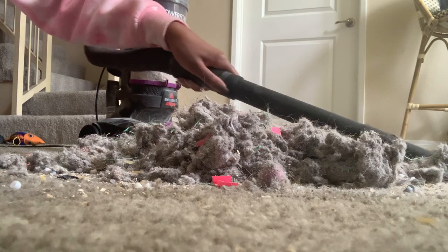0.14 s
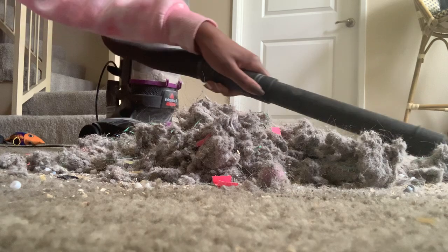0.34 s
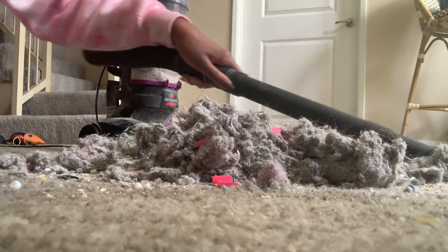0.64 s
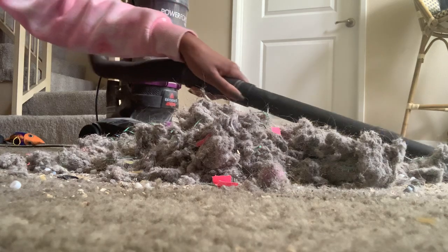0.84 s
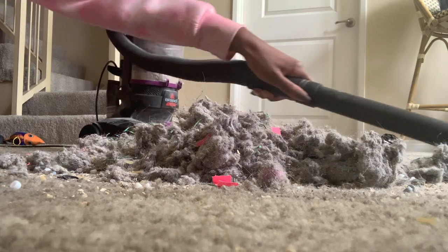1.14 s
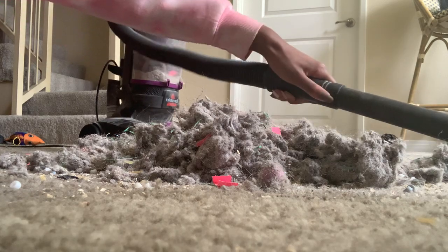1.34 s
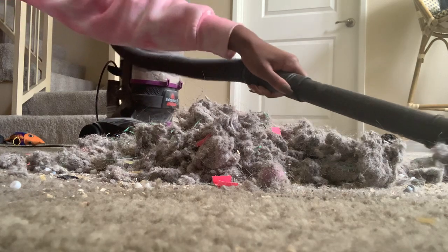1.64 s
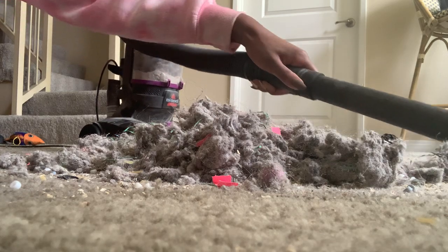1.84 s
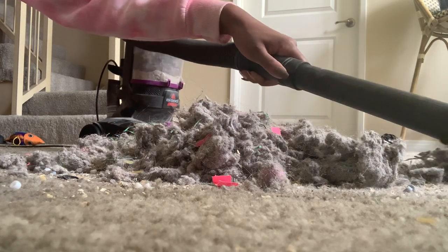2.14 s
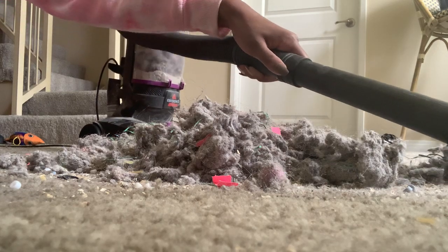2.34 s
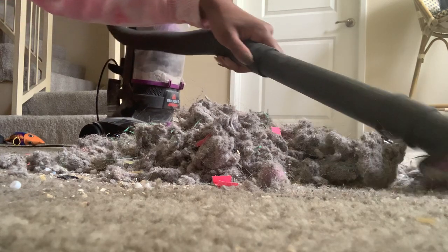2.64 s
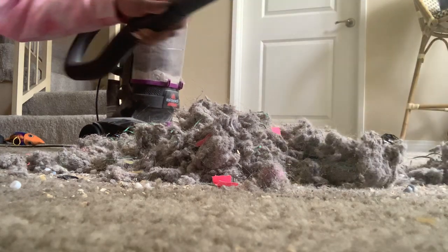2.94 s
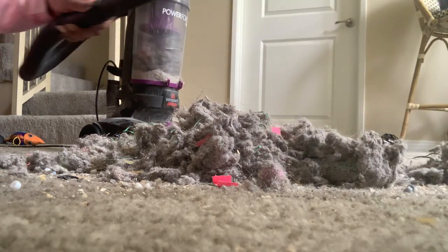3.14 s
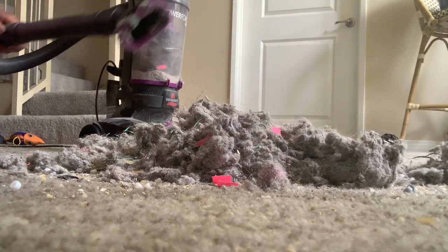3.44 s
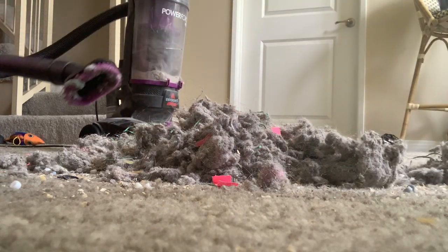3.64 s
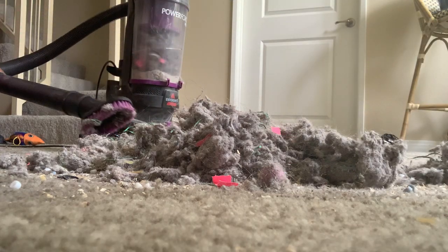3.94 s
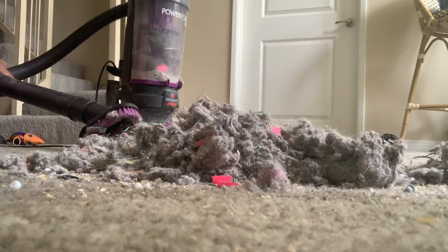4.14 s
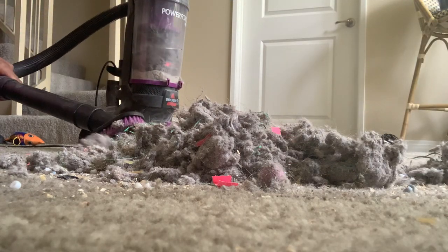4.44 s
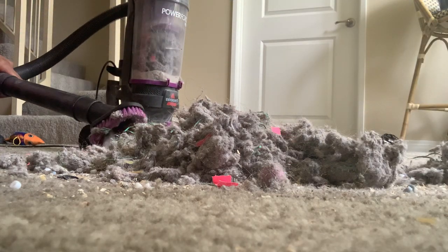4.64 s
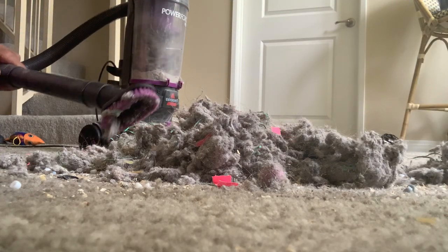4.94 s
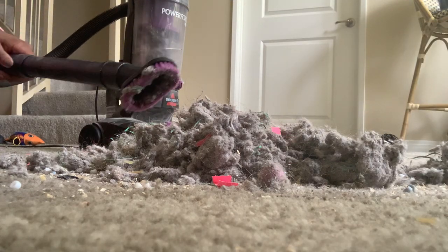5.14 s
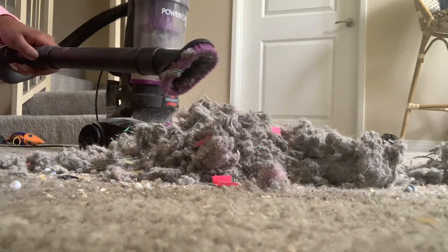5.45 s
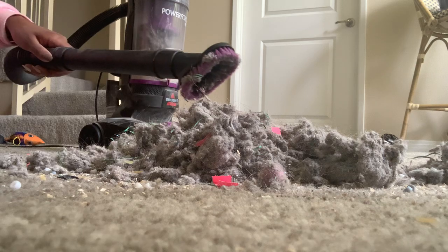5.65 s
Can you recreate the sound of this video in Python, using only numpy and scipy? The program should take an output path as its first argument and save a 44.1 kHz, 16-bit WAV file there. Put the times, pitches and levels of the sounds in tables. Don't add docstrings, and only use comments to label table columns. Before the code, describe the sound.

Continuous vacuum noise heard close and low in a furnished room, in stereo. The motor tone holds nearly steady, dipping a little under load in the middle while the hose flutters softly. Small debris ticks and rattles irregularly throughout. Muffled floor thumps and a wand knock occur in the first second, a hard double snap near two, a ping near three, and a cluster of thumps after four and a half.

```python
import sys
import numpy as np
from scipy import signal
from scipy.fft import rfft, irfft, next_fast_len
from scipy.io import wavfile

SR = 44100
rng = np.random.default_rng(int(sys.argv[2]) if len(sys.argv) > 2 else 0)


def unload_audio(sound):
    columns = np.transpose(np.atleast_2d(sound))
    steps = np.round(np.clip(columns, -1, 1) * 32767)
    wavfile.write(sys.argv[1], SR, steps.astype(np.int16))


def elevation(decibels):
    levels = np.asarray(decibels, float)
    return 10 ** (levels / 20)


N = 254892
TIME_S = np.arange(N) / SR

# t/s, shaft f/Hz, whine level/dB, left-right/dB as the hose shades it
MOTOR_RUN = [(0.05, 482.6, -25, .8), (0.42, 483.8, -24.5, 0.5), (0.6, 479.6, -26, 6),
             (1.0, 479.4, -26.5, 6.7), (1.2, 479.7, -27, 8), (1.4, 476.2, -27, 3.5), (1.6, 475.5, -29, 0.5),
             (1.8, 475.6, -29, 5.5), (2.0, 475.5, -29, 2.5), (2.6, 473.5, -29, 3.5), (3.0, 477.7, -30, 5),
             (3.2, 480.8, -27, 7.5), (3.6, 482.6, -26, 1.5), (4.0, 482, -25.5, -.2),
             (4.55, 484.6, -25.5, -0.5), (4.75, 486.8, -27.5, 0), (5.0, 484.3, -25.5, -0.5),
             (5.73, 483.3, -25, -1.1)]
SHAFT_IDLE_HZ = 483.0


def rms_one(x):
    return x / np.sqrt(np.mean(x ** 2) + 1e-20)


def in_time(rows):
    s, *columns = np.transpose(rows)
    return [np.interp(TIME_S, s, c) for c in columns]


def at_hz(points, hz):
    at, *columns = np.transpose(points)
    return [np.interp(np.log(hz + 1), np.log(at), c) for c in columns]


def drift(rate):
    r = np.exp(-80 * np.pi * rate / SR)
    chance = rng.standard_normal(N // 40 + 2002)
    slow = signal.lfilter([1], [1, -2 * r, r * r], chance)[2000:]
    return np.interp(np.arange(N) / 40, np.arange(len(slow)), rms_one(slow))


def phase_of(hz):
    return 2 * np.pi * np.cumsum(hz) / SR


def shaped(x, response):
    size = next_fast_len(N + 2048, real=True)
    return irfft(rfft(x, size) * response(np.fft.rfftfreq(size, 1 / SR)), size)[..., :N]


def panned(pan_db):
    return elevation([[pan_db / 2], [-pan_db / 2]])


def shaft_loss_hz():
    return SHAFT_IDLE_HZ - in_time(MOTOR_RUN)[0]


def port_pair(hz):
    # f/Hz, likeness 0-1, right lead/rad, left-right/dB
    port_match = [(60, 1, 0.5, 1), (250, 0.79, -0.33, -8.5), (660, 0.5, -0.5, 3), (1070, 0.5, -1.3, 2),
                  (1740, 0.2, .3, 0), (2300, 0.35, 3.3, -1), (2750, 0.78, 3.25, .5), (3200, 0.77, 3.4, 1),
                  (3700, 0.4, 3.2, 1), (4700, 0.33, 2.6, .5), (6100, 0.6, 1., -.5), (6700, 0.52, 1.6, 1),
                  (7150, 0.74, 2.35, 1), (7800, 0.93, 2.9, 0)]
    lag_hz, opposed_hz = 8200., 8300.
    scatter = 0.37
    alike, lead, pan_db = at_hz(port_match, hz)
    above = hz > port_match[-1][0]
    lead = np.where(above, np.pi + 2 * np.pi * (hz - opposed_hz) / lag_hz, lead)
    alike = np.where(above, np.sqrt(1 - scatter * np.sin(lead) ** 2), np.clip(alike, 0, 1))
    pan_db = np.where(above, 0, pan_db * (hz < port_match[-1][0]))
    left_gain, right_gain = elevation(pan_db / 2), elevation(-pan_db / 2)
    right = alike * np.exp(1j * lead) * right_gain
    room = np.sqrt(1 - alike ** 2) * right_gain
    return np.array([left_gain, right, room])


def ports(direct, diffuse):
    left, right, room = shaped(np.array([direct, direct, diffuse]), port_pair)
    return np.array([left, right + room])


def thumps():
    # t/s, peak level/dB, first f/Hz, last f/Hz
    floor_blows = [(0.302, -32, 400, 98.5), (0.329, -36, 300, 100), (0.408, -27, 260, 230),
                   (.429, -15.5, 463, 84.5), (0.467, -27, 150, 90), (.505, -32, 120, 84.5),
                   (0.786, -33, 150.3, 110), (0.809, -23, 260, 223), (.862, -23, 400, 255),
                   (0.982, -29, 333, 120), (4.449, -28, 379, 282.4), (4.482, -28, 218, 90.2),
                   (4.526, -28, 220.7, 82), (4.589, -28, 199, 123), (4.633, -15, 413, 90),
                   (4.675, -16, 79.7, 115.6), (4.678, -42, 352, 300), (4.713, -15.5, 520, 87),
                   (4.748, -32, 110, 95), (4.81, -26, 80.1, 100), (4.852, -21, 475.4, 93),
                   (5.149, -33, 200.7, 130)]
    cycles, pan_db = 1.82, -4.5
    out = np.zeros((2, N))
    low_band = signal.butter(2, [60, 420], "band", fs=SR, output="sos")
    rumble = rms_one(signal.sosfilt(low_band, rng.standard_normal(N)))
    for s, peak_db, first_hz, last_hz in floor_blows:
        length_s = cycles / last_hz
        share = np.arange(round(3 * length_s * SR)) / (length_s * SR)
        i = round(s * SR)
        sweep = np.sin(phase_of(last_hz + (first_hz - last_hz) * np.exp(-6. * share)))
        blow = elevation(peak_db) * np.sin(np.pi * np.minimum(share, 1) ** 0.5) * sweep
        tail = elevation(peak_db - 17.0) * share * np.exp(1 - 0.86 * share) * rumble[i:i + len(share)]
        out[:, i:i + len(share)] += panned(pan_db) * (blow + tail)
    return out


def knocks():
    # t/s, peak level/dB, brightness/dB per octave
    wand_hits = [
        (0.5463, -15.5, 0),
        (0.8632, -25, 0.0011),
    ]
    # f/Hz, level/dB, t60/s
    wand_modes = [(260, -7, 0.058), (519, 10, 0.022), (760, -4, 0.023), (1120, -2, 0.013),
                  (1600, -2, 0.0044)]
    out, t = np.zeros(N), np.arange(2000) / SR
    attack = np.minimum(t / .0009, 1)
    for s, peak_db, bright_db in wand_hits:
        for hz, level_db, t60 in wand_modes:
            octaves = np.log2(hz / wand_modes[0][0])
            level = elevation(peak_db + level_db + bright_db * octaves - 60 * t / t60)
            out[round(s * SR):][:len(t)] += level * attack * np.sin(2 * np.pi * hz * t)
    return out


def pings():
    # t/s, peak level/dB, f/Hz
    nozzle_pings = [
        (2.769, -29, 2484),
        (2.9535, -18.5, 3916),
    ]
    burst_s = 0.0011
    out = np.zeros(N)
    for s, db, hz in nozzle_pings:
        burst = np.exp(-((TIME_S - s - burst_s) / burst_s) ** 2)
        out += elevation(db) * burst * np.sin(2 * np.pi * hz * TIME_S)
    return out


def snaps():
    # t/s, peak level/dB
    wall_cracks = [
        (1.8995, -1),
        (1.9087, 0.5),
    ]
    hz, burst_s = 11500, .00009
    out = np.zeros(N)
    for s, db in wall_cracks:
        t = TIME_S - s
        out += elevation(db) * np.exp(-(t / burst_s) ** 2) * np.sin(2 * np.pi * hz * t)
    return out


def grit():
    # t/s, level/dB, brightness/dB per band
    lone_grains = [(0.0845, -21, 6), (0.1077, -19, 4), (0.2413, -13, -3), (0.33, -21, 9),
                   (0.371, -15.5, 0.5), (0.7, -19, 4), (0.83, -17, 2), (0.8763, -23, 4), (0.9259, -24, 6),
                   (0.9626, -25, 9), (1.2664, -23, 1), (1.5399, -24, 10), (1.762, -21, 9),
                   (1.8934, -23, -5), (1.966, -20, 3), (2.0332, -22.5, 5), (2.1869, -13, -2),
                   (2.2658, -22, 7), (2.541, -19, 8.5), (3.622, -19, 3), (3.6553, -18, -1),
                   (3.7418, -13, 0), (3.7831, -15.5, 2), (3.831, -22.5, 9), (4.132, -24, 11),
                   (4.682, -19, -2), (4.7063, -22, 0), (4.8598, -21, 3), (5.1449, -11, -0.5),
                   (5.4309, -19, 5)]
    # t/s, level/dB, brightness/dB per band
    more_grains = [(.8195, -23.5, 9), (1.2106, -20.5, 9), (1.443, -25, 2), (2.3186, -19, -2),
                   (3.029, -18, 3), (3.0833, -19, 1), (3.146, -17, 4), (3.2065, -18, 3), (3.2225, -25, 3),
                   (3.4856, -20, 3), (3.7929, -19, 5), (3.923, -17, -7), (3.9471, -11, -1),
                   (3.9572, -15, -1), (4.0096, -24, -1), (4.0571, -23, 1), (4.5835, -25, 10),
                   (4.627, -23, 8.5), (4.995, -31, 3), (5.5546, -29, 5), (5.3942, -24, 4)]
    # t/s, level/dB, brightness/dB per band, gap/s, second strike/dB
    bouncing_grains = [(0.043, -18, 4, .009, -1), (0.1988, -19, 4, .0102, 4), (0.3118, -20, 9, 0.0098, 5),
                       (1.3018, -26, 9, 0.013, 1), (1.609, -19, 6.5, 0.011, -1),
                       (1.7312, -20, 4.5, 0.0048, 6.5), (1.8215, -16.5, 2.5, 0.0098, -12),
                       (1.9006, -21, 5, .009, 0), (2.0821, -23, -3, 0.012, -6), (3.876, -18, 1, 0.011, 6),
                       (4.0024, -19, 3, 0.012, 6), (4.106, -14, 3.5, 0.0095, -6), (4.7451, -23, 2, 0.01, 3),
                       (4.795, -17.5, 2.5, .0112, 1), (4.9014, -18, 3, 0.012, -2),
                       (5.0654, -20, -3, 0.0041, 1), (5.0917, -17, 2, 0.0087, -3),
                       (5.1752, -13, 0.5, 0.01, 2.5), (5.3824, -34, 8, 0.011, 7),
                       (5.6949, -19, 6.5, 0.012, 0)]
    # low f/Hz, high f/Hz
    grain_bands = [
        (2500, 10900),
        (6000, 11200),
        (11000, 16700),
    ]
    strikes = []
    for s, db, bright, gap, again in bouncing_grains:
        strikes.append((s, db, bright))
        strikes.append((s + gap, db + again, 0.96 * bright))
    s, tick_db, bright_db = np.transpose(list(lone_grains) + list(more_grains) + strikes)
    fade, rattle = np.exp(-1 / (.0009 * SR)), np.exp(-1 / (0.004 * SR))
    falls = rng.random(N) < 160 * elevation(4 * drift(3)) / SR
    small = falls * elevation(-33.0 + 3.7 * np.minimum(rng.exponential(1, N), 2))
    sign = rng.choice([-1, 1], N)
    out = np.zeros(N)
    for k, (low_hz, high_hz) in enumerate(grain_bands):
        band = signal.butter(3, [low_hz, high_hz], "band", fs=SR, output="sos")
        own_colour_db = 5.1 * np.clip(rng.standard_normal(N), -2, 1)
        clicks = small * elevation(-3.0 * (0.5 - k) + own_colour_db) + 1e-18
        clicks[(s * SR).astype(int) - 8] += elevation(tick_db + bright_db * (k - 0.5))
        crack = signal.sosfilt(band, clicks * sign) * np.sqrt(SR / (high_hz - low_hz))
        noise = rms_one(signal.sosfilt(band, rng.standard_normal(N)))
        after = signal.lfilter([elevation(-11.0)], [1, -fade], clicks)
        after += signal.lfilter([elevation(-20.0)], [1, -rattle], clicks)
        out += elevation(2.5) * crack + noise * after
    return out


def flutter():
    # t/s, f/Hz
    first_dive = [(1.0, 103.9), (1.2, 101.9), (1.33, 99.3), (1.47, 94.55), (1.62, 97.0), (1.72, 100),
                  (1.77, 102)]
    # t/s, f/Hz
    second_dive = [(1.84, 100.5), (1.89, 97.06), (2.0, 94.7), (2.2, 96.6), (2.45, 92.9), (2.6, 93.8),
                   (2.78, 97.3), (2.95, 101.5)]
    # multiple, level/dB, slope/dB per Hz above the full pitch
    hose_harmonics = [(1, 3, -5.5), (2, -4.5, 1), (3, 3.5, -1.6), (4, -2, -1.5), (6, 6.5, -0.2),
                      (9, -12, 1.5), (10, -6, -3.5)]
    full_hz = 98
    plunges = list(first_dive) + list(second_dive)
    hz, = in_time(plunges)
    free_hz = np.maximum(hz - full_hz, 0)
    to_edge_s = np.minimum(TIME_S - plunges[0][0], plunges[-1][0] - TIME_S)
    loaded = np.clip(to_edge_s / 0.02, 0, 1)
    tone = np.zeros(N)
    for k, db, slope in hose_harmonics:
        level = elevation(db + slope * free_hz + 1.27 * drift(11.0))
        tone += level * np.sin(round(k) * phase_of(hz) + 0.25 * drift(3.9))
    return loaded * elevation(-43) * tone


def air():
    # f/Hz, level/dB per Hz
    housing_colour = [(30, -17), (65, -9.5), (110, -0.5), (175, -16.5), (230, -3.5), (420, -1), (590, 4.5),
                      (750, -1), (1100, -4), (1400, -10), (2200, -24.5)]
    # f/Hz, level/dB per Hz
    throat_colour = [(1200, -56), (1600, -7), (1950, -12), (2500, 0), (2750, -3.5), (3100, 8), (3500, -1.5),
                     (3900, -20)]
    # f/Hz, level/dB per Hz
    mouth_colour = [(3000, -12), (3500, 3), (4300, 0.5), (4800, -2), (6000, 0.5), (7100, -3), (7700, -7),
                    (8300, 11)]
    # f/Hz, level/dB per Hz
    hiss_colour = [(6600, -29), (7300, -4), (8700, 0), (10000, -3), (12000, -1.5), (15650, -2),
                   (15850, -28), (15950, -34)]
    # t/s, jet level/dB, throat opening/dB
    nozzle_flow = [(0, -29.5, -13), (.2, -30.5, -15), (.6, -30, -14.5), (1.0, -29, -14.5), (1.28, -27, -15),
                   (1.6, -28.5, -16.5), (1.9, -30.5, -12), (2.25, -27.5, -14.5), (2.65, -28, -14.5),
                   (2.9, -26, -10), (3.12, -25.5, -14), (3.5, -25, -16), (3.93, -25, -18),
                   (4.2, -28.5, -18.5), (4.35, -28, -18.5), (4.62, -28.5, -15), (4.8, -32.5, -15.5),
                   (5.3, -28.5, -15.5)]
    # t/s, jet loss/dB
    jet_dips = [
        (.44, 0.5),
        (1.41, 3.5),
        (3.76, 3.5),
        (4.87, 2),
        (5.45, 4),
        (5.75, 7),
    ]
    # t/s, half length/s, loss/dB
    pile_seals = [(.15, .03, 10), (.55, .09, 7), (.88, .04, 12), (1.02, .04, 9), (1.15, .06, 9),
                  (2.1, .12, 8), (3.2, .04, 10), (3.41, .05, 12), (3.58, .05, 16), (3.72, .03, 10),
                  (3.97, .04, 16), (4.3, .1, 9), (4.55, .11, 10), (5.01, .07, 16), (5.31, .05, 16),
                  (5.51, .03, 14), (5.62, .04, 16), (5.75, .02, 9)]
    dip_s = 0.13
    lift_s, lift_span_s = 3.13, 0.045
    throat_room_db = 2.5
    mouth_sealed = .15

    jet_db, open_db = in_time(nozzle_flow)
    throat_db = 4 + jet_db + open_db
    for s, db in jet_dips:
        jet_db = jet_db - db * np.exp(-((TIME_S - s) / dip_s) ** 2)
    sealed_db = np.zeros(N)
    for s, half_s, db in pile_seals:
        sealed_db += db * np.exp(-((TIME_S - s) / half_s) ** 4)
    taut_db = 2 / (1 + np.exp((TIME_S - lift_s) / lift_span_s))
    housing_db = -36.5 + taut_db - 0.03 * shaft_loss_hz() + 0.49 * drift(7.4)
    mouth_db = -32 + 0.94 * (jet_db + 28.5)
    gust = .5 * drift(7.3) + drift(112)

    def blown(colour, level_db, patchy_db):
        top_hz = colour[-1][0]
        noise = shaped(rng.standard_normal((2, N)), lambda hz: elevation(at_hz(colour, hz)[0]) * (hz < top_hz))
        return rms_one(noise) * elevation(level_db + patchy_db * (gust + 0.9 * drift(26)))

    housing = blown(housing_colour, housing_db, 0.54)
    throat, throat_twin = blown(throat_colour, throat_db, 1.38)
    mouth = blown(mouth_colour, mouth_db, 0.56)
    hiss = blown(hiss_colour, jet_db - 0.4, 0.76)
    mouth[1] *= elevation(-mouth_sealed * sealed_db)
    return housing + mouth + hiss + np.array([throat, throat_twin * elevation(throat_room_db - sealed_db)])


def motor():
    # t/s, level/dB
    blade_level = [(0, -52), (.55, -36), (.75, -52), (.95, -32.5), (1.2, -46), (1.6, -47), (1.85, -50),
                   (2.25, -35.5), (2.6, -58), (2.85, -40), (3.05, -41), (3.25, -43), (3.7, -57), (4.4, -52),
                   (4.7, -47), (4.85, -43), (5.15, -32), (5.55, -47)]
    # shaft multiple, brush multiple, level/dB, left-right/dB
    brush_lines = [(0, 1, -46.5, 0.5), (0, 2, -50, -5.5), (0, 3, -54, 15.5), (1, 1, -45.5, -6.5),
                   (2, -1, -59.5, 19), (2, 0, -56, -11), (2, 1, -46.5, 6), (1, 6, -65.5, 12)]
    blades, brush_idle_hz = 9, 107.4
    brush_sag = 1.4
    hz, whine_db, shade_db = in_time(MOTOR_RUN)
    lost_hz = shaft_loss_hz()
    shaft, brush = phase_of(hz), phase_of(brush_idle_hz - brush_sag * lost_hz)

    lead = 0.54 + 0.12 * np.abs(lost_hz)
    left = elevation(whine_db + shade_db / 2) * np.sin(shaft)
    right = elevation(whine_db - shade_db / 2) * np.sin(shaft + lead)
    out = elevation(4.0 + 0.047 * drift(9.2)) * np.array([left, right])

    turned = np.pi + .33 * lost_hz + .3 * drift(2)
    blade = elevation(in_time(blade_level)[0] - 0.5 + 3.4 * drift(5.1))
    out += blade * np.array([np.sin(blades * shaft), np.sin(blades * shaft + turned) * elevation(2.5)])

    muffled_db = 2.4 * np.maximum(lost_hz - 1.5, 0)
    for k, m, level_db, pan_db in brush_lines:
        phase = round(k) * shaft + round(m) * brush + 0.64 * drift(2.8)
        sides = panned(pan_db) * np.sin(phase + [[0], [.7]])
        out += elevation(level_db + 3.5 + 1.83 * drift(8.6) - muffled_db * (k == 0)) * sides
    return out


def scene():
    rush, twin = air()
    near = grit() + snaps() + flutter()
    through_ports = ports(rush + near, twin + np.roll(near, 60))
    return through_ports + motor() + thumps() + knocks() + pings()


def band_limit(x):
    return signal.sosfilt(signal.butter(12, 16980, fs=SR, output="sos"), x)


def record(dry):
    dry = signal.sosfilt(signal.butter(3, 42., "high", fs=SR, output="sos"), dry)
    dry = signal.sosfilt(signal.cheby2(10, 20, 16300, fs=SR, output="sos"), dry)
    return band_limit(dry)


dry = scene()
out = record(dry)
unload_audio(out)
```